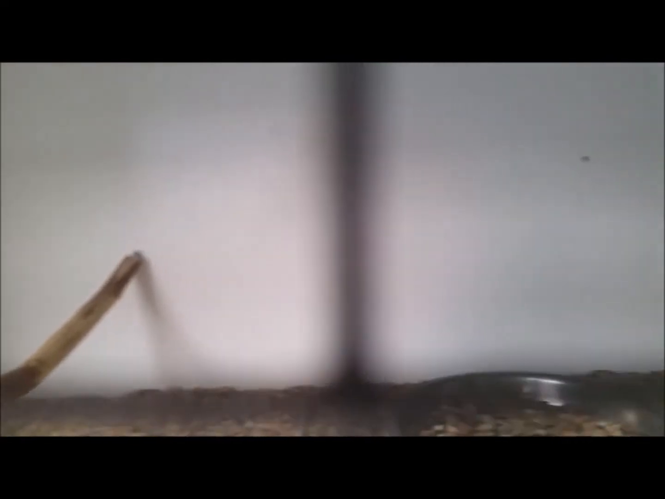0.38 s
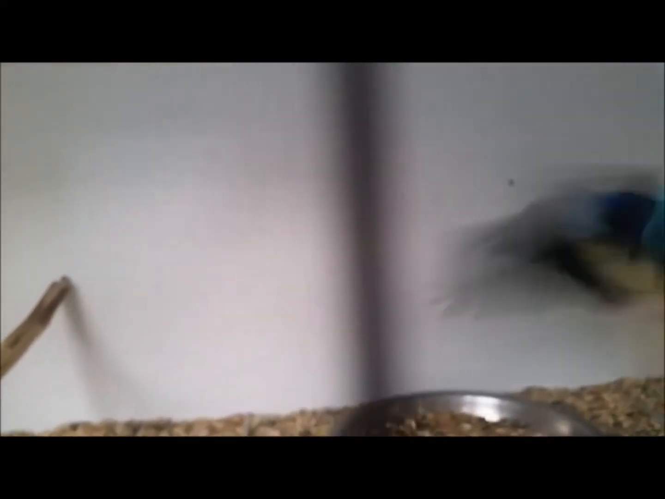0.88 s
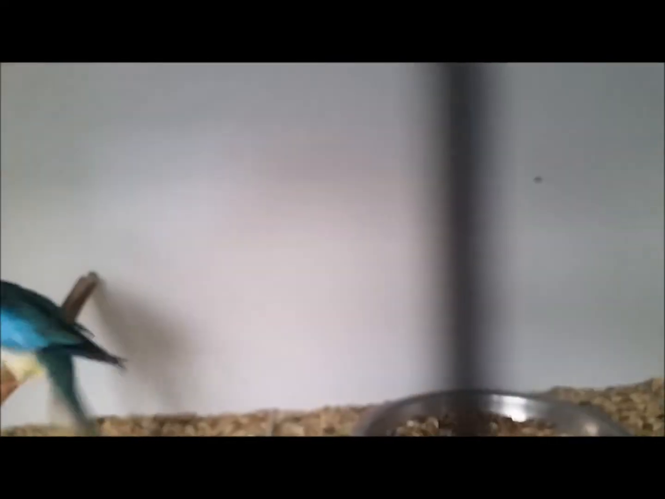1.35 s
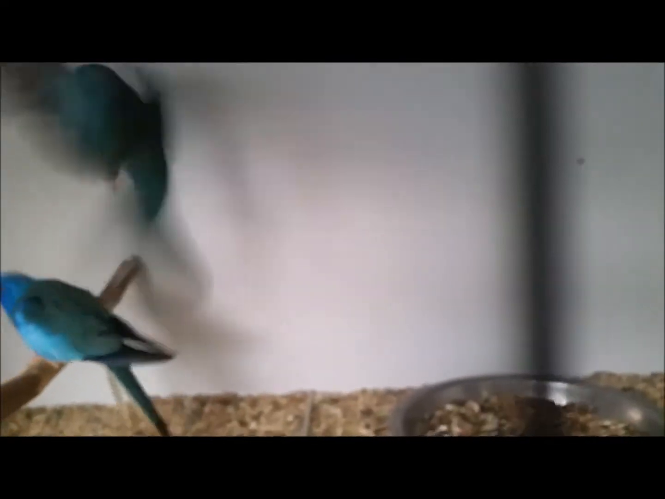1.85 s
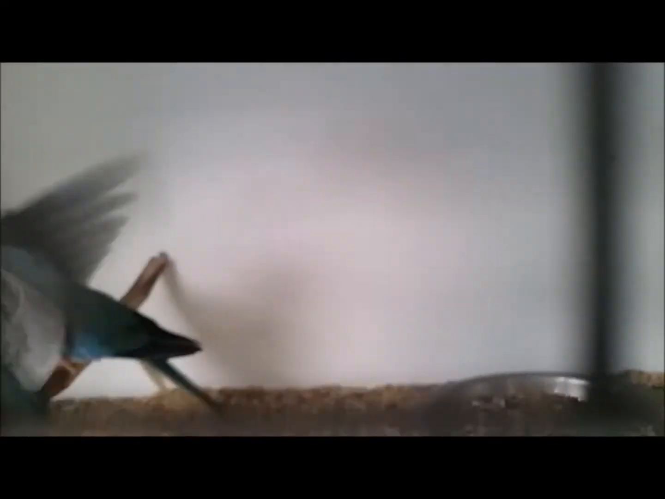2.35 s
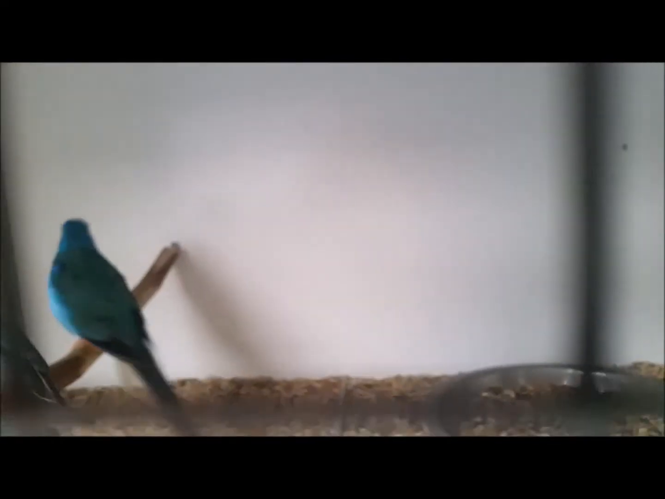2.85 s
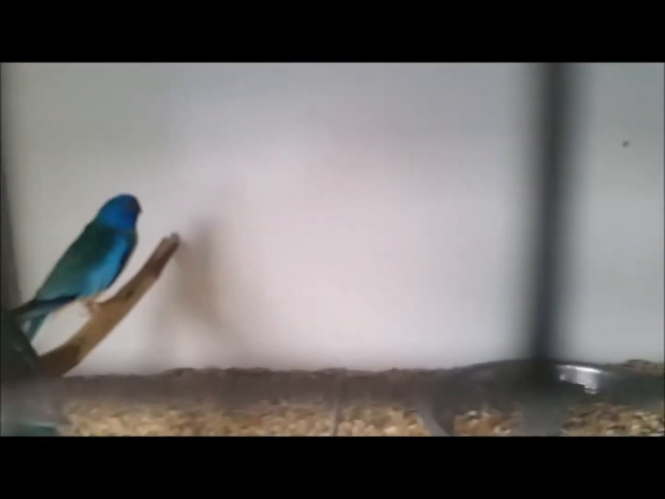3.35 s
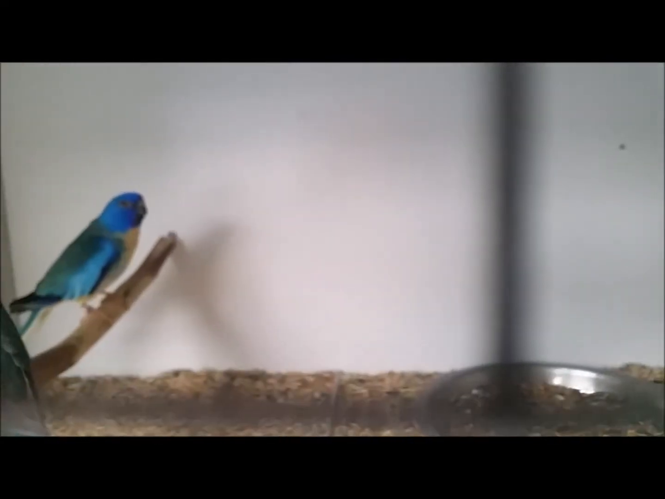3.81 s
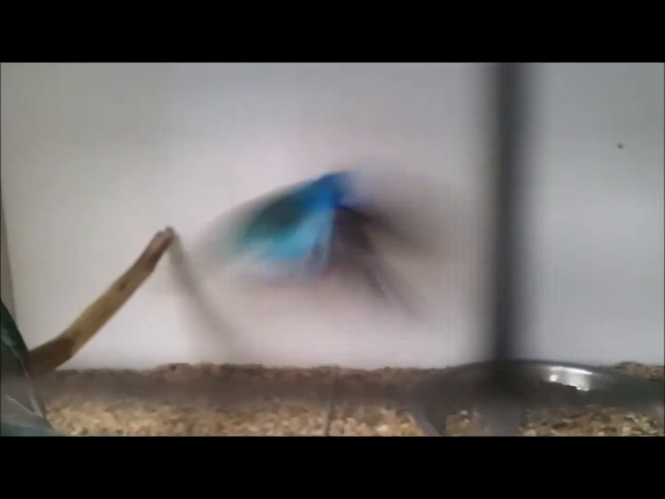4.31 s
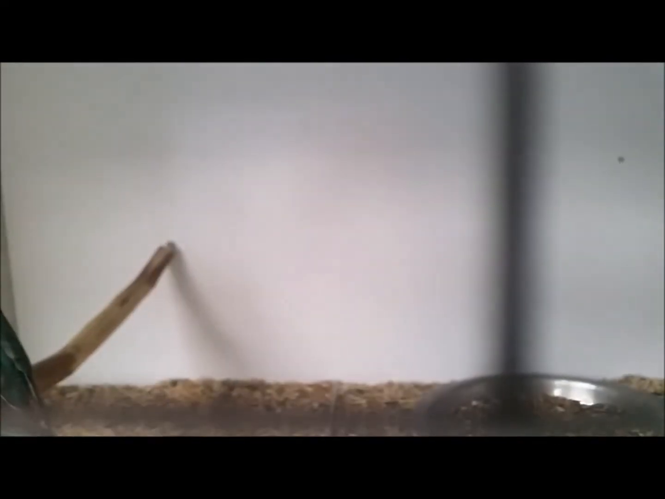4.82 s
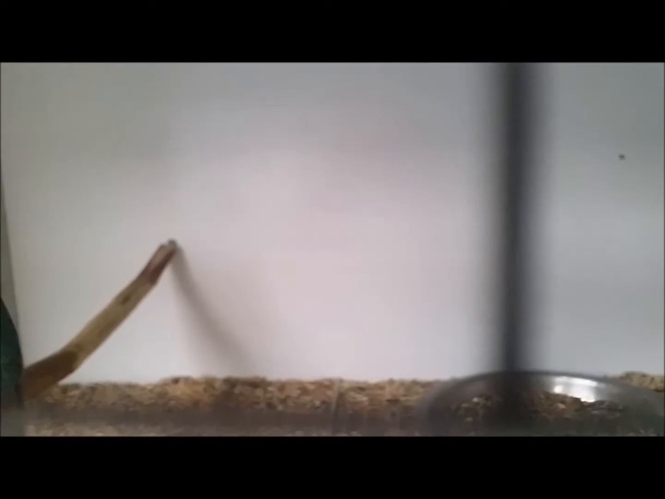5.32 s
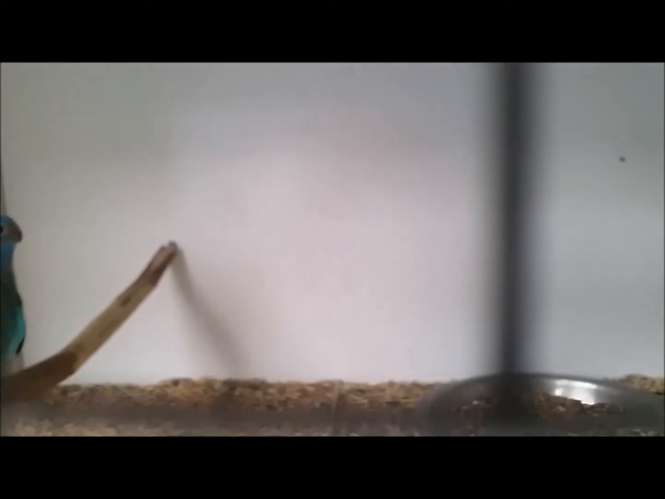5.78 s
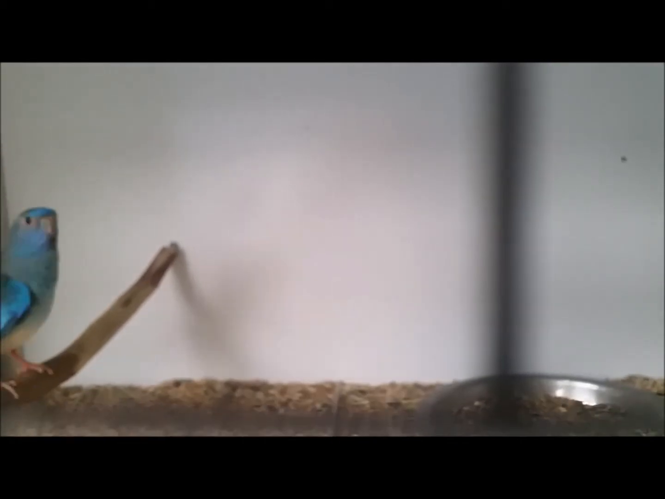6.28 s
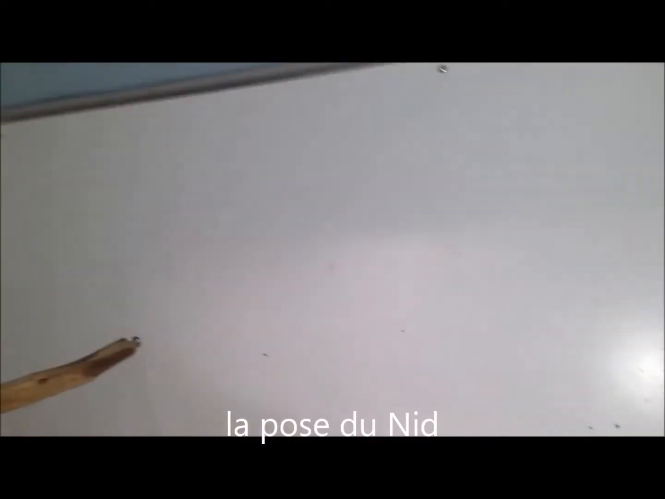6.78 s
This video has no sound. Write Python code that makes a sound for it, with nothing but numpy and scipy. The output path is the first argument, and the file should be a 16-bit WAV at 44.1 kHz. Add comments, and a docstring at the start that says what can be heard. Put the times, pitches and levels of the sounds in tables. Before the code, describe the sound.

Small parrots whistle, peep and warble up close in a hard-walled cage while wings flutter in bursts and landings knock, over soft hiss and low hum.

```python
"""Small parrots in a hard-walled cage, close to a camera with two microphone ports; hum and hiss lie underneath.
It opens with a knock (ringing modes) and a whistle (bending tone), then peeps (gliding tones) and a whistle.
Wings flap from 0.9 to 2.5 s (noise bursts); from 2.8 s whistles, warbles (buzzing tones) and peeps follow.
Wire snaps (noise ticks) and a run of knocks come near 4.9 s; warbles, peeps and whistles go on to the end.
Faint far birds, shaking and rustling run through it; the hum (one low tone) swells before the cut at 6.69 s."""
import sys
import numpy as np
from scipy import signal
from scipy.fft import rfft, irfft
from scipy.io import wavfile
from scipy.ndimage import uniform_filter1d

SR = 44100
rng = np.random.default_rng(int(sys.argv[2]) if len(sys.argv) > 2 else 0)


def gain_from_decibels(decibels):
    """Convert decibel values to linear amplitude factors."""
    exponent = np.asarray(decibels, float) / 20
    return 10 ** exponent


def generate_wav(sig):
    """Save sig (samples, or channels by samples) to the path in sys.argv[1] as 16-bit PCM at SR."""
    pcm = np.round(np.clip(np.atleast_2d(sig).T, -1, 1) * 32767).astype(np.int16)
    wavfile.write(sys.argv[1], SR, pcm)


N = 304731


def evened(x):
    """Scales a sound to an rms (average strength) of 1."""
    return x / np.sqrt(np.mean(x ** 2) + 1e-20)


def smooth_random(shape, samples):
    """Slow random ups and downs: white noise averaged over a number of samples."""
    return uniform_filter1d(rng.standard_normal(shape), size=samples)


def read(points, hz):
    """Reads a table between its points, along log frequency."""
    f, value = np.transpose(points)
    return np.interp(np.log(hz + 1), np.log(f + 1), value)


def add(mix, s, sound, pan_db=0., late_ms=0.):
    """Adds a sound to both channels at s seconds; the left one can be louder or later."""
    sound = sound * gain_from_decibels(np.array([[.5], [-.5]]) * pan_db)
    if late_ms:
        # turning the phase in step with frequency delays by a fraction of a sample
        hz = np.fft.rfftfreq(sound.shape[1], 1 / SR)
        turn = np.exp(-2j * np.pi * hz * late_ms / 1000)
        sound[0] = irfft(rfft(sound[0]) * turn, sound.shape[1])
    part = mix[:, round(max(s, 0) * SR):][:, :sound.shape[1]]
    part += sound[:, :part.shape[1]]


# how alike the noises are left and right: f/Hz, likeness (0 to 1)
LIKENESS = [(30, .9), (70, .78), (140, .55), (290, .4), (640, .25), (1400, .02), (16000, 0)]


def noise(spectrum, patchy_db):
    """Two channels of coloured noise whose strength drifts in patches of time and pitch, rms 1."""
    hz = np.fft.rfftfreq(1024, 1 / SR)
    a, b, c, d, patches = rng.standard_normal((N // 256 + 5, 513, 5)).T
    patches = uniform_filter1d(patches, size=9, axis=0)
    patches = evened(uniform_filter1d(patches, size=8, axis=1))
    same = np.clip(read(LIKENESS, hz), 0, 1)[:, None]
    left = a + 1j * b
    right = same * left + np.sqrt(1 - same ** 2) * (c + 1j * d)
    z = np.array([left, right])
    z *= gain_from_decibels(read(spectrum, hz)[:, None] + patchy_db * patches)
    return evened(signal.istft(z, nperseg=1024, noverlap=768)[1][:, :N])


def voice(hz, tones, unsteady, buzz=0.):
    """A membrane tone with overtones on the pitch curve hz, trembling a little; buzz shakes its phase."""
    tremble = evened(smooth_random(len(hz), 60))
    angle = 2 * np.pi * np.cumsum(hz * (1 + unsteady * tremble)) / SR + buzz
    return evened(sum(gain_from_decibels(db) * np.sin(k * angle) * (k * hz < 17000) for k, db in tones))


# the low tone over time: t/s, f/Hz, level/dB, wavering/dB (scales a random up and down)
HUM_COURSE = [(0, 53.6, -52, 2), (.6, 54.07, -57.5, 5.5), (1.3, 54, -50.5, 16), (2.2, 55.3, -39, -4),
              (2.6, 53.3, -60, 7), (3.3, 51.47, -55, 3), (3.8, 52.27, -45, 14), (4.2, 54.7, -54.5, 8),
              (4.65, 52.8, -46.5, -3.5), (5.93, 51.15, -40.5, 3.8), (6.49, 50.75, -30, -0.6),
              (6.68, 53.4, -28.5, 1.5)]


def hum():
    """A low tone between 50 and 56 Hz that wavers in level, then steadies and swells."""
    t = np.arange(N) / SR
    s, *columns = np.transpose(HUM_COURSE)
    hz, db, waver_db = (np.interp(t, s, c) for c in columns)
    waver = np.interp(t, np.arange(100) / 14, rng.uniform(-2, 1.2, 100))
    angle = 2 * np.pi * np.cumsum(hz) / SR + np.array([[.2], [-.2]])
    return np.sqrt(2) * gain_from_decibels(db + waver_db * waver) * np.sin(angle)


# colour of the room hiss: f/Hz, relative level/dB per Hz
ROOM_COLOUR = [(880, -12), (1500, -3.5), (1980, -3), (2140, -7.5), (2870, -9.5), (3220, -6), (3880, -8.5),
               (5580, -17), (8330, -14), (9500, -37), (12400, -62), (20900, -120)]
# colour of the higher air hiss: f/Hz, relative level/dB per Hz
AIR_COLOUR = [(4120, -54.5), (7000, -8.5), (8350, 3), (9230, -12.5), (12300, 1), (15100, -14.5),
              (16100, -5.5), (16500, -40)]
ROOM_DB, AIR_DB = -59.5, -65.5  # at rest
# the gain control's rise of both hisses: its time spread in s, its levels in dB against the swish
RISE_S, RISE_ROOM_DB, RISE_AIR_DB = 0.14, -17.5, -13.5
# while calls are above this level in dB the hiss is thinner, by this many dB per dB, smoothed over s
THIN_FROM_DB, THIN_SHARE, THIN_S = -25.5, .8, .045


def hiss(birds):
    """Room and air noise: the camera's gain control raises both around wing strokes;
    the camera's processing thins them during loud calls."""
    t = np.arange(0, N, 64) / SR
    bumps = sum(gain_from_decibels(db) * np.exp(-((t - s) / RISE_S * 2) ** 2) for s, db, _ in WING_STROKES)
    rise = np.interp(np.arange(N) / SR, t, bumps)
    power = abs(uniform_filter1d((birds ** 2).mean(0), round(THIN_S * SR)))
    loud_db = 10 * np.log10(power + 1e-12)
    high = (gain_from_decibels(AIR_DB) + gain_from_decibels(RISE_AIR_DB) * rise) * noise(AIR_COLOUR, patchy_db=1.1)
    room = (gain_from_decibels(ROOM_DB) + gain_from_decibels(RISE_ROOM_DB) * rise) * noise(ROOM_COLOUR, patchy_db=4.0)
    return (high + room) / gain_from_decibels(THIN_SHARE * np.maximum(loud_db - THIN_FROM_DB, 0))


# birds moving about: t/s, cage shaking level/dB, litter rustle level/dB
MOVEMENTS = [(0, -46, -41.5), (.12, -41, -49.5), (.4, -47.5, -60.5), (.84, -41.5, -59), (1.1, -40, -53),
             (1.6, -41.5, -56.5), (2.06, -40.5, -50.5), (2.3, -38, -54.5), (2.8, -39.5, -51.5),
             (3.06, -45.5, -48.5), (3.45, -40, -41), (3.65, -47.5, -50), (4.1, -42, -56.5),
             (4.25, -45.5, -51), (4.8, -45, -53.5), (4.95, -34, -42.5), (5.07, -42, -54.5),
             (5.7, -47.5, -53.5), (5.95, -45, -48.5), (6.5, -39, -46.5)]
# colour of the shaking cage: f/Hz, relative level/dB per Hz
SHAKE_COLOUR = [(12, -39.5), (20, -11.5), (60, -0.5), (92, -0.5), (134, -7), (161, -15.5), (206, -10.5),
                (238, -23.5), (308, -14.5), (500, -28.5), (650, -60.5), (1100, -120)]
# colour of the rustling litter: f/Hz, relative level/dB per Hz
RUSTLE_COLOUR = [(180, -27), (300, 1.5), (328, -14), (397, -10.5), (664, -7.5), (1380, -13.5), (1800, -19),
                 (2600, -27), (3380, -47), (5720, -120)]


def shaking_and_rustling():
    """The cage shakes and litter rustles as the birds move: two noises that rise and fall."""
    t = np.arange(N) / SR
    s, *levels = np.transpose(MOVEMENTS)
    shake, rustle = (gain_from_decibels(np.interp(t, s, db)) for db in levels)
    litter = rustle * noise(RUSTLE_COLOUR, patchy_db=1.2)
    return litter + shake * noise(SHAKE_COLOUR, patchy_db=3.0)


# faint far birds: t/s, length/s, f/Hz (sounds 3 % lower), level/dB before the swell and the mix
FAR_NOTES = [(1.453, 0.037, 2540, -44), (2.531, 0.18, 4350, -48.5), (2.599, 0.054, 3970, -47),
             (3.688, 0.057, 3844, -52), (3.747, 0.076, 4000, -52.5), (3.871, 0.042, 3330, -51.5),
             (4.455, 0.071, 3420, -59.5), (5.25, 0.051, 3380, -59), (6.36, 0.069, 3590, -54.5)]


def far_birds():
    """Thin wavering single tones that swell and fade, from another cage."""
    out = np.zeros((2, N))
    for s, length, hz, db in FAR_NOTES:
        swell = np.hanning(round(length * SR))
        add(out, s, gain_from_decibels(db) * swell * voice(hz * np.ones(len(swell)), [(0.97, 0)], 0.079))
    return out


def ring(modes, rise_s):
    """Dying tones after a soft blow; the higher ones reach the two ports out of step."""
    t = np.arange(SR // 2) / SR
    port_t = t + np.array([[0], [.0003]])
    total = 0
    for (hz, db, t60), (a, b) in zip(modes, rng.random((len(modes), 2))):
        pitch = hz * (.995 + 0.0082 * a)  # each blow is tuned slightly differently
        total = total + gain_from_decibels(db - 60 * t / t60) * np.sin(2 * np.pi * (pitch * port_t + b))
    return total * (1 - np.exp(-t / rise_s))


# knocks on the cage: t/s, thin panel level/dB, whole box level/dB (both added to the mode levels)
CAGE_KNOCKS = [(0.0044, -20.5, -25), (0.1652, -41, -35), (0.4594, -71.5, -34.5), (0.7276, -60, -36.5),
               (1.044, -48, -39.5), (1.3106, -49, -30.5), (3.8636, -45.5, -57), (4.8693, -27, -24.5),
               (4.901, -32, -62), (4.934, -102, -30), (4.9758, -27, -24), (5.0099, -40.5, -24),
               (5.0393, -49, -35), (5.0917, -30, -30), (5.4153, -33, -31), (6.2493, -60, -34),
               (6.456, -40.5, -37.5)]
# ringing of a thin panel: f/Hz, level/dB, time to fall 60 dB t/s
PANEL_MODES = [(1200, 8, 0.079), (1040, -12, 0.16), (1650, -39, .06), (1820, -9, 0.066),
               (2100, -23.5, 0.05)]
# ringing of the whole box: f/Hz, level/dB, time to fall 60 dB t/s
BOX_MODES = [(116.7, 6.5, 0.2), (92.4, -15.5, 0.89), (129.8, -7, 0.042), (201, -22.5, 0.36),
             (308.6, -9, 0.25), (345.5, -7.5, 0.12), (608.4, -19.5, 0.18)]


def knocks():
    """A landing rings a thin panel and the whole box, each with its own set of tones."""
    out = np.zeros((2, N))
    for s, panel_db, box_db in CAGE_KNOCKS:
        panel = gain_from_decibels(panel_db) * ring(PANEL_MODES, rise_s=0.0043)
        box = gain_from_decibels(box_db) * ring(BOX_MODES, rise_s=0.011)
        add(out, s - .002, panel + box)
    return out


# claws and beaks snapping on wood and wire: t/s, dull level/dB, dull f/Hz, bright level/dB
CLAW_SNAPS = [(1.892, -24.5, 350, -32), (2.62, -18.5, 347, -65), (4.3042, -12.5, 890, -46),
              (4.860, -38, 900, -13), (4.9652, -43, 900, -14), (5.874, -25, 800, -58.5),
              (6.506, -33, 500, -55.5)]


def snaps():
    """A dull tick on wood, about one cycle long, and a short bright rattle of wire made of noise."""
    out, t = np.zeros((2, N)), np.arange(1500) / SR
    # a quick start, then a fast fade and a weaker slow one
    rattle = np.minimum(t / .0004, 1) * (np.exp(-t / .0012) + .12 * np.exp(-t / .008))
    for s, dull_db, dull_hz, bright_db in CLAW_SNAPS:
        dull = np.sin(2 * np.pi * dull_hz * t) * np.exp(-1.8 * dull_hz * t)
        bright = np.diff(smooth_random((2, len(t) + 1), 2)) * rattle
        add(out, s - .001, gain_from_decibels(dull_db) * dull + gain_from_decibels(bright_db) * bright)
    return out


# wing strokes: t/s, swish level/dB, thump level/dB
WING_STROKES = [(0.8629, -44.5, -43), (0.9148, -54, -84.5), (0.9594, -60, -52), (1.021, -46.5, -63),
                (1.1004, -45.5, -51), (1.182, -51.5, -62), (1.238, -43, -48), (1.4421, -46.5, -49.5),
                (1.5178, -43, -40), (1.591, -42.5, -47), (1.6656, -43, -49), (1.762, -41, -46),
                (1.8416, -41.5, -37.5), (1.9061, -42, -37), (1.9914, -42.5, -45), (2.0622, -42, -63.5),
                (2.141, -39, -32), (2.218, -40, -37.5), (2.3057, -42, -79), (2.3865, -41, -38.5),
                (2.5217, -43, -68), (3.017, -48.5, -38), (3.085, -56, -41), (4.4615, -47.5, -66),
                (4.548, -44.5, -44.5), (4.6254, -47.5, -51), (4.7052, -51, -47), (5.049, -48.5, -56),
                (5.0794, -66.5, -46.5), (5.62, -53.5, -64)]
# colour of feathers cutting air: f/Hz, relative level/dB per Hz
SWISH_COLOUR = [(1290, -4.5), (2200, -5.5), (2660, -19.5), (4100, 2), (5570, -4.5), (6310, -24), (7520, 0),
                (11700, 5.5), (16000, -3)]
# colour of pushed air: f/Hz, relative level/dB per Hz
THUMP_COLOUR = [(60, -24.5), (120, 3.5), (300, -7), (900, -13.5), (2500, -25.5), (5000, -61)]


def wings():
    """Each downstroke is a sudden swish of noise that fades and a soft low thump of air."""
    swish, thump, t = np.zeros((2, N)), np.zeros((2, N)), np.arange(5000) / SR
    cut = np.minimum(t / .004, 1) * np.exp(-(t / 0.038) ** 1.1)
    push = np.minimum(t / .015, 1) * np.exp(-(t / .04) ** 2)
    for s, swish_db, thump_db in WING_STROKES:
        add(swish, s - .003, gain_from_decibels(swish_db) * cut)
        add(thump, s - .015, gain_from_decibels(thump_db) * push)
    thump *= noise(THUMP_COLOUR, patchy_db=1.2)
    return swish * noise(SWISH_COLOUR, patchy_db=5.0) + thump


# low peeps that slide up: t/s, length/s, end f/Hz, level/dB, rasp level/dB (before the mix)
RISING_PEEPS = [(0.356, 0.02, 1650, -40.5, -39.5), (0.794, 0.025, 1700, -65, -37.5),
                (0.863, 0.027, 1480, -54, -66), (1.039, 0.022, 1846, -35.5, -52),
                (1.28, .018, 1527, -46, -72), (1.31, .015, 1890, -35.5, -33.5),
                (2.883, 0.015, 1700, -36, -36.5), (2.93, 0.02, 1576, -41, -39),
                (3.366, 0.02, 1670, -36.5, -35), (4.061, 0.026, 1620, -41.5, -45),
                (4.111, 0.015, 1630, -43, -44), (4.25, 0.013, 1747, -43.5, -47),
                (4.277, 0.022, 1650, -37, -40.5), (4.348, 0.021, 1696, -40.5, -44.5),
                (4.579, 0.03, 1820, -38, -49), (4.71, 0.04, 1780, -48.5, -51),
                (4.828, .018, 1630, -41.5, -41.5), (5.464, 0.021, 1684, -42, -57),
                (5.514, .015, 2040, -41, -69), (5.649, 0.02, 1650, -43.5, -42.5),
                (5.728, 0.041, 1621, -43.5, -43.5), (5.963, 0.044, 2080, -49.5, -44),
                (6.068, 0.016, 1590, -38, -40), (6.117, 0.054, 2025, -47, -49)]
# low peeps that slide down: t/s, length/s, start f/Hz, end f/Hz, level/dB (before the mix)
FALLING_PEEPS = [(0.6, 0.011, 1834, 1826, -36.5), (1.457, 0.081, 2030, 1810, -62.5),
                 (1.58, 0.027, 2072, 1437, -34.5), (2.56, 0.0086, 2120, 1740, -41),
                 (3.625, 0.037, 1900, 1692, -36), (3.727, .024, 1582, 1385, -48.5)]
# overtones of a peep: multiple of f, relative level/dB
PEEP_OVERTONES = [(1, 4.5), (2, -4.5), (3, -10.5), (4, -6.5), (5, -8), (6, -18.5)]
# colour of the breathy edge: f/Hz, relative level/dB per Hz
RASP_COLOUR = [(530, -41.5), (900, -18), (1170, -4), (1570, -3), (2070, -8), (3470, -10), (5750, -42.5),
               (8150, -3.5), (16000, -29.5)]
SLIDE_FROM = .8  # a rising peep starts at this share of its end pitch
FALLING_RASP_DB = -15.5  # against the note


def peeps():
    """Short gliding notes with overtones, edged by a rasp of airy noise."""
    out, air = np.zeros((2, N)), noise(RASP_COLOUR, patchy_db=1.5)[0]
    rows = [(s, length, SLIDE_FROM * hz, hz, db, rasp_db) for s, length, hz, db, rasp_db in RISING_PEEPS]
    rows += [(*row, row[-1] + FALLING_RASP_DB) for row in FALLING_PEEPS]
    for s, length, start_hz, end_hz, db, rasp_db in rows:
        u = np.linspace(0, 1, round(length * SR))
        hz = end_hz + (start_hz - end_hz) * (1 - u) ** 1.7
        swell = np.sin(np.pi * u ** 0.7) ** .6
        note = gain_from_decibels(db) * voice(hz, PEEP_OVERTONES, 0.016) * swell
        rasp = gain_from_decibels(rasp_db) * air[round(s * SR):][:len(u)] * signal.windows.tukey(len(u), .7)
        add(out, s, note + rasp, pan_db=1)
    return out


# long warbles: t/s, length/s, last note f/Hz, level/dB, breath level/dB (the shape adds to both levels)
LONG_NOTES = [(2.881, .105, 4955, -40, -35.5), (4.057, 0.13, 4800, -41.5, -50),
              (4.828, .13, 4626, -34, -28), (5.467, .127, 4586, -41.5, -47),
              (6.068, 0.13, 4586, -29, -26.5)]
# a buzz, an accent and a jump to a clean note:
# share of length, pitch over last note, level/dB, buzz depth/radians, breath level/dB
LONG_COURSE = [(0, .73, -19, 0.81, -21), (.1, .84, 1.5, 0.46, -7.5), (.47, .86, -1, 1.26, -1.7),
               (.58, .84, 9.5, 0.29, -1.5), (.71, .85, -8.5, 0.28, -8.5), (.79, .99, 6.5, .25, -27.5),
               (.9, 1.01, -4, 0.058, -20), (1, 1.01, -27.5, .15, -25.5)]
# short warbles: t/s, length/s, last note f/Hz, level/dB, breath level/dB (the shape adds to both levels)
SHORT_NOTES = [(4.25, .047, 4490, -32, -52), (4.351, 0.043, 4510, -30.5, -56),
               (5.648, 0.048, 4480, -29, -56), (5.745, 0.044, 4374, -29.5, -59)]
# a scoop that overshoots and settles on a clean note:
# share of length, pitch over last note, level/dB, buzz depth/radians, breath level/dB
SHORT_COURSE = [(0, .7, -18, .6, 1), (.2, .77, -14.5, 1, -1), (.33, 1.1, -11, 0.1, -7),
                (.58, 1.01, -2.7, .2, 8.5), (1, .99, -22, .2, -7.5)]
# overtones of a warble: multiple of f, relative level/dB
WARBLE_OVERTONES = [(1, -7), (2, -23), (3, -30.5)]
# colour of the hoarse air: f/Hz, relative level/dB per Hz
BREATH_COLOUR = [(880, -48.5), (1500, -20.5), (1940, -8), (2880, -31.5), (3840, -8), (6240, -43.5),
                 (7920, -17), (9750, -32), (12500, -3), (16000, -95)]
BUZZ_HZ = 677  # mean rate of the second membrane, heard as side tones above and below the centre


def warbles():
    """A tone buzzed by a second membrane, throbbing unevenly, that rises to a cleaner last note."""
    out, air = np.zeros((2, N)), noise(BREATH_COLOUR, patchy_db=8)[0]
    for shape, rows in ((LONG_COURSE, LONG_NOTES), (SHORT_COURSE, SHORT_NOTES)):
        share, *columns = np.transpose(shape)
        for s, length, last_hz, tone_db, air_db in rows:
            u = np.linspace(0, 1, round(length * SR))
            pitch, db, depth, breath_db = (np.interp(u, share, c) for c in columns)
            drift, throb = (evened(smooth_random(len(u), 150)) for _ in range(2))
            buzz = depth * np.sin(2 * np.pi * np.cumsum(BUZZ_HZ * (1 + .13 * drift)) / SR)
            wander = 1 + .025 * depth * throb  # the buzzier, the less steady the centre
            tone = voice(last_hz * pitch * wander, WARBLE_OVERTONES, 0.0205, buzz)
            tone *= gain_from_decibels(tone_db + db + 4.25 * throb)
            breath = gain_from_decibels(air_db + breath_db + 2 * throb) * air[round(s * SR):][:len(u)]
            add(out, s, tone + breath, pan_db=1.5, late_ms=-.05)
    return out


# whistles, mostly U-shaped; the faint one at 2.83 s stays level:
# t/s, length/s, lowest f/Hz, level/dB (before trill, swell and mix), left port late/ms
WHISTLE_NOTES = [(-.012, 0.095, 4933, -20.5, -0.061), (0.627, 0.084, 4930, -19.5, -.028),
                 (2.829, 0.033, 5870, -47, -0.046), (2.874, 0.086, 4924, -29, -0.011),
                 (4.74, 0.074, 5236, -21, 0.065), (5.893, 0.08, 4950, -23, -0.037),
                 (6.465, 0.092, 4900, -27, -0.027)]
# overtones of a whistle: multiple of f, relative level/dB
WHISTLE_OVERTONES = [(1, 0), (2, -0.5), (3, -14.5)]
TRILL_PER_S = 180
# a whistle at FULL_DB starts and ends on these pitches; a softer one reaches less high
FULL_DB, START_HZ, START_HZ_PER_DB, END_HZ, END_HZ_PER_DB = -20, 5770, 37.5, 5845, 48
DIP_SHARE = .4  # share of the length at which a U-shaped whistle is lowest


def whistles():
    """Most drop in pitch and climb again, a faint one stays level; a second membrane beats as a rough trill."""
    out = np.zeros((2, N))
    for s, length, low_hz, db, late_ms in WHISTLE_NOTES:
        u = np.linspace(0, 1, round(length * SR))
        bend = np.interp(u, [0, DIP_SHARE, 1], [-1, 0, 1])
        start_hz = START_HZ + START_HZ_PER_DB * (db - FULL_DB)
        end_hz = END_HZ + END_HZ_PER_DB * (db - FULL_DB)
        top_hz = np.where(bend < 0, start_hz, end_hz)
        # no bend where the top would lie below the lowest pitch
        hz = low_hz + np.maximum(top_hz - low_hz, 0) * np.sin(np.pi / 2 * bend) ** 2
        beat = 2 * np.pi * (TRILL_PER_S * length * u + rng.random())
        trill = 1 + .55 * np.cos(beat)
        tone = trill * voice(hz * (1 + 0.028 * np.sin(beat)), WHISTLE_OVERTONES, 0.025)
        tone *= gain_from_decibels(db) * np.sin(np.pi * u ** 1.29) ** 0.65
        begun = round(max(-s, 0) * SR)  # a note from before the start is joined midway
        add(out, s, tone[begun:], .3, late_ms)
    return out


def cage(x):
    """Hard close walls: dense echoes of random sign, a fast tail and a weak slow one from the room."""
    at = np.arange(60, 20000, 20) + rng.integers(0, 20, (2, 997))
    taps = np.zeros((2, 20100))
    np.put_along_axis(taps, at, rng.choice([-1., 1.], at.shape), 1)
    t = np.arange(20100) / SR
    taps *= gain_from_decibels(-60 * t / .15) + gain_from_decibels(-26 - 60 * t / .5)
    return signal.fftconvolve(x, taps / np.linalg.norm(taps[0]), axes=1)[:, :N]


def scene():
    """Birds and snaps echo inside the cage; the other sounds join without echo."""
    birds = whistles() + warbles() + peeps() + far_birds()
    ticks = snaps()
    calls = gain_from_decibels(-4) * birds + gain_from_decibels(-2.5) * cage(birds)
    contacts = ticks + gain_from_decibels(-2.0) * cage(ticks) + wings() + knocks()
    return calls + contacts + shaking_and_rustling() + hum() + hiss(calls)


def low_pass(x):
    """Removes everything above the highest recorded frequency."""
    return signal.sosfilt(signal.butter(12, 15950, fs=SR, output="sos"), x)


# a dip from the camera housing: f/Hz, level/dB
HOUSING = [(100, -1.5), (5600, -2), (6100, -7), (6700, -9.5), (7300, -7), (8000, -10), (16000, 3)]
# how the two ports differ: f/Hz, left over right level/dB
PORT_BALANCE = [(60, -1.5), (150, 2.5), (300, 1.5), (600, 6.5), (1400, 8), (3000, 2), (5000, -1.5),
                (9000, 9.5), (14000, -8.5)]
CUT_S = 6.69  # silence from here on


def record(dry):
    """The housing and the two ports colour the sound, which stops with a 3 ms fade."""
    hz = np.fft.rfftfreq(N, 1 / SR)
    half = gain_from_decibels(read(PORT_BALANCE, hz) / 2)
    ported = irfft(rfft(dry) * gain_from_decibels(read(HOUSING, hz)) * np.array([half, 1 / half]), N)
    gate = np.clip((CUT_S - np.arange(N) / SR) / .003, 0, 1)
    return low_pass(ported * gate)


dry = scene()
out = record(dry)
generate_wav(out)
```